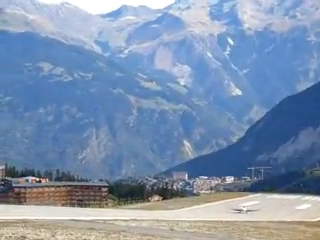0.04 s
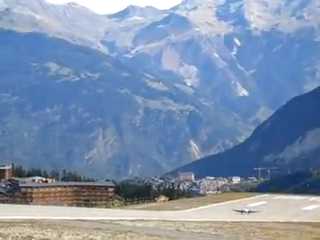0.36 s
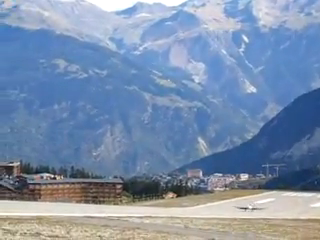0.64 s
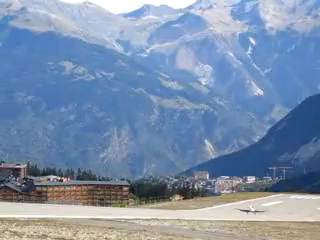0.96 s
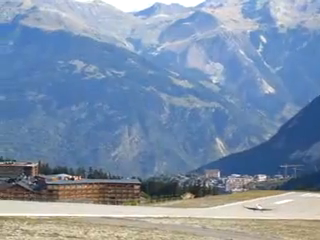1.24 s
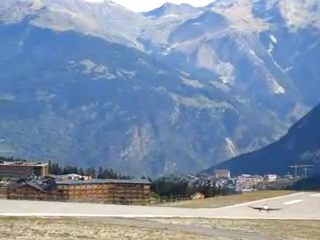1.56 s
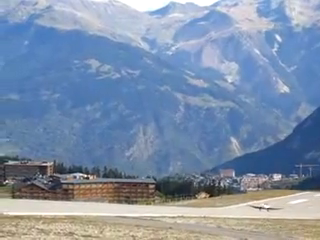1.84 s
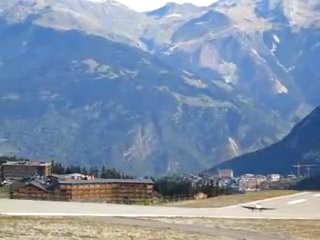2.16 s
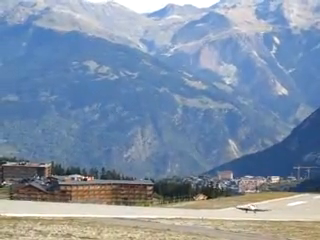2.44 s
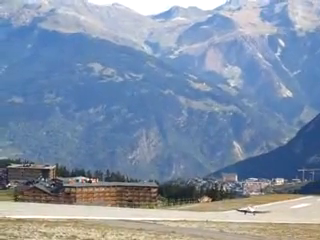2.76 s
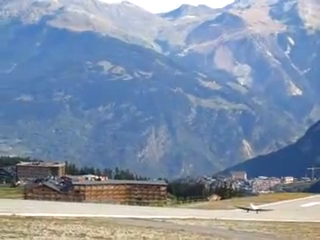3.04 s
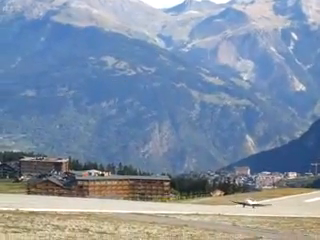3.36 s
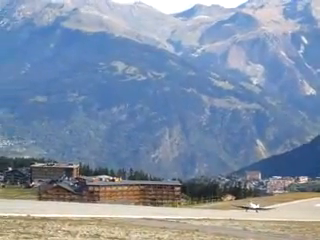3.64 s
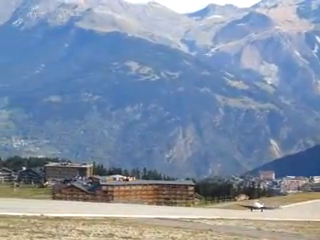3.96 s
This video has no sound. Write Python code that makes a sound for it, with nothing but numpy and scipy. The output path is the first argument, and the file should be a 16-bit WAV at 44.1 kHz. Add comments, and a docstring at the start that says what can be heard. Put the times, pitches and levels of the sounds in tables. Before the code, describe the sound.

A small propeller plane's engine idles fast on an outdoor airstrip. At about 0.8 seconds it slows to a low, uneven burble. From around 1.8 seconds it revs up, rising in pitch and loudness as tyre noise grows, with a few brief exhaust cracks. From 3 seconds it holds a raspy drone until the end at 4 seconds. Wind rumbles on the microphone throughout, over a faint hiss.

```python
"""Light aircraft on a mountain airstrip

A four-cylinder propeller engine idles fast, is throttled back and burbles, then opens up to a drone.
Its periodic firings give low harmonics, excite the exhaust pipe's resonances and modulate a rush of
gas and a rasp. Tyres roll on the runway; wind rumbles on the microphone over faint hiss and a whine."""
import sys
import numpy as np
from scipy import signal
from scipy.fft import rfft, irfft, next_fast_len
from scipy.io import wavfile

SR = 44100
rng = np.random.default_rng(int(sys.argv[2]) if len(sys.argv) > 2 else 0)


def waveform_to_disk(signal):
    """Save audio, clipped to [-1, 1], as 16-bit WAV at the path in sys.argv[1]."""
    frames = np.transpose(np.atleast_2d(signal))
    scaled = np.clip(frames, -1, 1) * 32767
    samples = np.round(scaled).astype(np.int16)
    wavfile.write(sys.argv[1], SR, samples)


N = 176400

# engine speed and drone: (time [s], firing rate [Hz], relative levels of harmonics 1, 2, 3 [dB])
ENGINE = [(0.0, 58.1, -31, -30, -37), (0.34, 58.1, -29, -30, -46), (0.37, 58.0, -31, -30, -30),
          (0.4, 57.7, -29, -28, -40), (0.71, 57.3, -32, -29, -36), (0.79, 53.4, -38, -37, -43),
          (0.81, 52.1, -30, -36, -34), (0.83, 50.9, -31, -38, -52), (0.93, 48.5, -40, -43, -48),
          (0.97, 47.2, -33, -31, -39), (1.12, 42.4, -41, -33, -30), (1.22, 40.6, -44, -36, -42),
          (1.25, 40.0, -39, -31, -35), (1.4, 39.7, -39, -30, -34), (1.76, 39.6, -40, -26, -31),
          (1.9, 43.3, -36, -30, -34), (2.0, 47.4, -32, -27, -30), (2.17, 52.3, -28, -26, -40),
          (2.45, 64.0, -22, -25, -36), (2.52, 66.3, -21, -26, -32), (2.76, 71.8, -25, -24, -29),
          (3.01, 74.6, -28, -25, -25), (3.49, 75.8, -26, -28, -29), (4.0, 75.9, -27, -29, -27)]
# overtones at full power: (frequency [multiple of firing rate], level [dB])
OVERTONES = [(1.25, -36.5), (1.75, -36), (2.75, -43.5), (3.25, -42), (4.5, -46.5), (5, -46.5), (5.5, -43),
             (6, -38.5), (6.5, -49.5), (8.5, -50), (9.5, -47), (11.75, -45.5), (12.75, -44)]
# cylinders in firing order: (relative strength [dB], lateness [share of one firing])
CYLINDERS = [(5.5, 0), (1.5, 0.0848), (-1, -.06), (6.5, .04)]
# reflections from the ground and buildings: (delay [s], mean gain [dB])
ECHOES = [(.0047, -6), (.031, -10.5), (.074, -9.5)]
# engine effort, as relative levels: (time [s], exhaust [dB], rasp [dB], top hiss [dB])
EFFORT = [(0.0, -40, -49.5, -58), (0.47, -38.5, -49, -57.5), (0.84, -44, -52.5, -59),
          (1.32, -43, -57, -57.5), (1.89, -41, -50.5, -61), (2.06, -40.5, -48, -58.5),
          (2.3, -34, -41.5, -49), (2.63, -27.5, -37.5, -46.5), (2.9, -28.5, -37.5, -47),
          (3.0, -29.5, -36.5, -50.5), (3.44, -29.5, -39, -56), (3.61, -29, -39, -47.5),
          (3.95, -29, -39.5, -43.5)]
# low burble of uneven firing: (time [s], level [dB])
BURBLE_LEVEL = [(0, -37), (.45, -31), (.7, -36.5), (1.1, -34), (1.4, -36.5), (1.85, -33), (2.1, -34),
                (2.8, -29.5), (4, -36.5)]
# throttle position: (time [s], opening [0-1])
THROTTLE = [(0, 0.44), (1.95, 0.28), (2.25, 1), (2.85, 0.68), (3.2, 0.52), (4, .65)]
# resonance in the rasp: (time [s], centre [Hz], relative level [dB])
RASP_RESONANCE = [(.2, 3260, -2), (.6, 2740, -1), (1.3, 2700, -10.5), (2.12, 3360, -0.5), (2.38, 2679, -1),
                  (4, 2700, -7)]
# rolling noise of the tyres: (time [s], level [dB])
TYRE_LEVEL = [(.95, -47), (1.3, -57.5), (1.42, -46.5), (1.9, -46.5), (2.32, -35.5)]
# notch that sweeps down as the engine opens up: (time [s], centre [Hz], depth [0-1])
NOTCH = [(.6, 2250, 0.27), (1.9, 2220, 0), (2.3, 2083, .65), (2.47, 1460, 0.57), (3.0, 1210, 0.04)]
# harmonics of the biting propeller: (frequency [multiple of firing rate], relative level [dB])
BITE_HARMONICS = [(4, -35), (5, -44), (6, -39), (11, -41.5)]
# swell of those harmonics: (time [s], gain [dB])
BITE_SWELL = [(2.05, -15), (2.3, -2.5), (2.8, -0.5), (3.15, -18.5)]
# sharp cracks under power: (time [s], level at the crest [dB])
CRACKS = [(2.4225, -26), (2.777, -26), (2.8873, -24.5), (2.9007, -22), (2.9155, -23), (3.0374, -24)]

# spectral envelopes of the sources: (frequency [Hz], relative spectral density [dB])
PIPE_SPECTRUM = [(170, -21), (240, 17), (320, -4), (450, 0.5), (700, 2.5), (800, -9.5), (950, 2.5),
                 (1350, -13.5), (1750, -1), (2100, -24.5), (4000, -38.5)]
RUSH_SPECTRUM = [(200, -4.5), (350, -3), (460, 4), (580, 4), (780, -4.5), (1100, -4.5), (1380, -6),
                 (1750, -8), (2100, -11.5), (4000, -35)]
BURBLE_SPECTRUM = [(35, -24.5), (70, -6), (105, 7.5), (170, 2.5), (260, -1), (300, -8), (350, -24),
                   (550, -14), (800, -54)]
RASP_SPECTRUM = [(1000, -21), (1650, -3.5), (2100, -4.5), (2700, -1), (3350, -3.5), (3900, -11),
                 (5500, -24), (7000, -51.5)]
HISS_SPECTRUM = [(2000, -25.5), (3600, 4.5), (4500, 3.5), (5100, 0), (5700, -1.5), (6400, -32.5),
                 (7000, -28)]
TYRE_SPECTRUM = [(500, -16.5), (700, -2), (810, -5), (980, 2), (1150, -1.5), (1310, -8), (2200, -37.5)]
WIND_SPECTRUM = [(10, -20), (30, 6.5), (70, 8), (130, 0), (260, -17), (400, -39.5), (1000, -56.5)]
AIR_SPECTRUM = [(200, 2), (600, 2.5), (1200, -2.5), (2000, -16.5), (4500, -9.5), (6500, -30)]

IDLE_HZ, POWER_HZ = 51.3, 72.9   # firing rates between which power goes from 0 to 1
FIRING_OFFSET = 0.53   # place of the pulse in the firing cycle
RUSH_THROB, BURBLE_THROB, RASP_THROB = 0.35, 0.54, 1.03   # modulation depths


def from_db(db):
    """Amplitude ratio of a level in decibels."""
    return 10 ** (np.asarray(db) / 20)


def rms_one(x):
    """Normalisation to unit power."""
    return x / np.sqrt(np.mean(x ** 2) + 1e-20)


def in_time(rows):
    """Linear interpolation in time, one curve per column."""
    times, *columns = np.transpose(rows)
    return [np.interp(np.arange(N) / SR, times, column) for column in columns]


def drift(rate_hz):
    """Low-pass filtered noise: a slow random wander of unit power."""
    step, settle = 40, 2000
    pole = np.exp(-2 * np.pi * step * rate_hz / SR)
    white = rng.standard_normal(N // step + settle + 2)
    slow = signal.lfilter([1], [1, -2 * pole, pole * pole], white)[settle:]
    return np.interp(np.arange(N) / step, np.arange(len(slow)), rms_one(slow))


def coloured(x, spectrum):
    """Minimum-phase filtering imposes a spectral envelope causally; unit power."""
    size = 2 * next_fast_len(N)
    hz, db = np.transpose(spectrum)
    grid_hz = np.maximum(np.arange(size // 2 + 1) * SR / size, 1)
    magnitude = from_db(np.interp(np.log(grid_hz), np.log(hz), db))
    cepstrum = irfft(np.log(magnitude))
    response = np.exp(2 * rfft(cepstrum[:size // 2], size))
    return rms_one(irfft(rfft(x, size) * response)[:N])


def noise(spectrum, gate=1):
    """Source and filter: white noise is amplitude-modulated, then coloured."""
    return coloured(gate * rng.standard_normal(N), spectrum)


def band(centre_hz, width_hz, gate):
    """Quadrature modulation shifts gated low-pass noise to a moving centre; unit power."""
    lowpass = signal.butter(2, width_hz / 2, fs=SR, output="sos")
    slow = signal.sosfilt(lowpass, gate * rng.standard_normal((2, N)))
    angle = 2 * np.pi * np.cumsum(centre_hz) / SR
    return rms_one(slow[0] * np.cos(angle) + slow[1] * np.sin(angle))


def drone(phase, rate, harmonic_gain_db=-0.5, fade_db_per_hz=1.4):
    """Periodic sources radiate harmonics: propeller and exhaust hum, with overtones under power."""
    harmonics = overtones = 0
    for k, db in enumerate(in_time(ENGINE)[1:], 1):
        harmonics += from_db(db + harmonic_gain_db + 0.52 * drift(16)) * np.cos(2 * np.pi * k * phase)
    fade_db = fade_db_per_hz * np.maximum(POWER_HZ - rate, 0)
    for multiple, db in OVERTONES:
        angle = 2 * np.pi * (multiple * phase + rng.random()) + 0.25 * drift(6)
        overtones += from_db(db - fade_db + 1.2 * drift(4)) * np.cos(angle)
    return np.sqrt(2) * (harmonics + overtones)


def firings(phase, spread_db=2, jitter_s=0.00012):
    """A quasi-periodic impulse train: strength and timing vary by cylinder and by chance."""
    count = np.arange(1, int(phase[-1]))
    db, lateness = np.array(CYLINDERS)[count % len(CYLINDERS)].T
    timing_scatter, level_scatter = rng.standard_normal((2, len(count)))
    onsets = np.interp(count + lateness, phase, np.arange(N)) + jitter_s * SR * timing_scatter
    clicks = np.zeros(N)
    clicks[np.clip(onsets, 0, N - 1).astype(int)] = from_db(db + spread_db * level_scatter)
    return clicks / np.sqrt(np.gradient(phase))   # equal power at any firing rate


def outdoors(x):
    """Multipath propagation: delayed reflections waver with the moving air; unit power."""
    n = np.arange(N)
    echoes = sum(from_db(db + 2 * drift(2.9)) * np.interp(n - delay_s * SR, n, x, left=0)
                 for delay_s, db in ECHOES)
    return rms_one(x + echoes)


def exhaust(phase, rate):
    """Impulses excite the pipe's resonances; a rush of gas and a low burble throb with them."""
    exhaust_db = in_time(EFFORT)[0]
    power = np.clip((rate - IDLE_HZ) / (POWER_HZ - IDLE_HZ), 0, 1)
    firing = phase - FIRING_OFFSET
    throb = power * np.cos(2 * np.pi * firing) + 0.45 * np.cos(np.pi * firing)
    ringing = outdoors(coloured(firings(firing), PIPE_SPECTRUM))
    pulses = from_db(-11 + 6 * power) * ringing   # under power the pulses gain on the rush
    rush_db = -3 - 2.5 * power + 0.51 * drift(5.1)
    rush = from_db(rush_db) * noise(RUSH_SPECTRUM, np.exp(RUSH_THROB * throb))
    burble = from_db(in_time(BURBLE_LEVEL)[0]) * noise(BURBLE_SPECTRUM, np.exp(BURBLE_THROB * throb))
    return from_db(exhaust_db) * (pulses + rush) + burble


def rasp(phase):
    """Amplitude modulation: a burst of hiss on each firing, sharper as the throttle opens."""
    _, rasp_db, hiss_db = in_time(EFFORT)
    throttle, = in_time(THROTTLE)
    centre_hz, resonance_db = in_time(RASP_RESONANCE)
    burst = np.abs(np.cos(np.pi * (phase - FIRING_OFFSET))) ** 8
    uneven = 1 + 0.18 * drift(45)
    gate = np.exp(RASP_THROB * throttle * (burst - burst.mean()) * uneven)
    broadband = from_db(0.5) * noise(RASP_SPECTRUM, gate)
    resonance = from_db(resonance_db - 4.5) * band(centre_hz, width_hz=320, gate=gate ** 1.3)
    top_hiss = from_db(hiss_db + 0.3) * noise(HISS_SPECTRUM, gate ** 0.5)
    return from_db(rasp_db + 0.5 * drift(8)) * (broadband + resonance) + top_hiss


def tyres():
    """Rolling contact of rubber on the runway radiates a narrow band of noise."""
    return from_db(in_time(TYRE_LEVEL)[0] + 1.7 * drift(2.8)) * noise(TYRE_SPECTRUM)


def swept_notch(x, width_hz=350):
    """Destructive interference: subtracting a moving band gives a phasing colour."""
    centre_hz, depth = in_time(NOTCH)
    carrier = np.exp(2j * np.pi * np.cumsum(centre_hz) / SR)
    pole = np.exp(-np.pi * width_hz / SR)
    baseband = signal.lfilter([1 - pole], [1, -pole], x / carrier)
    return x - 2 * depth * np.real(carrier * baseband)


def wind(mean_db=-36.5, gust_db=1):
    """Pressure fluctuations of wind on the microphone make a low rumble."""
    return from_db(mean_db - gust_db * drift(12)) * noise(WIND_SPECTRUM)


def open_air(level_db=-52):
    """Stationary broadband noise forms a faint outdoor hiss."""
    return from_db(level_db) * noise(AIR_SPECTRUM)


def whine(pitch_hz=2054, mean_db=-63):
    """A thin pure tone wavers under slight random amplitude and phase modulation."""
    amplitude = np.sqrt(2) * from_db(mean_db + drift(2.9))
    return amplitude * np.sin(2 * np.pi * pitch_hz * np.arange(N) / SR + 0.5 * drift(6.5))


def propeller_bite(phase):
    """The propeller growls as it speeds up; phase modulation roughens its upper harmonics most."""
    swell_db, = in_time(BITE_SWELL)
    return np.sqrt(2) * sum(from_db(db + swell_db) * np.cos(2 * np.pi * k * phase + 0.07 * k * drift(20))
                            for k, db in BITE_HARMONICS)


def cracks(half_width_s=0.0011, band_hz=(2200, 3020)):
    """Transients: single firings snap out of the rasp as noise bursts with Gaussian envelopes."""
    t = np.arange(N) / SR
    bandpass = signal.butter(2, band_hz, "band", fs=SR, output="sos")
    hiss = rms_one(signal.sosfilt(bandpass, rng.standard_normal(N)))
    return hiss * sum(from_db(db) * np.exp(-((t - at_s) / half_width_s) ** 2) for at_s, db in CRACKS)


def scene():
    """Superposition of the sources; one firing rate paces drone, exhaust, rasp and propeller."""
    rate = in_time(ENGINE)[0]
    phase = np.cumsum(rate) / SR   # counted in firings
    hum = drone(phase, rate)
    roar = swept_notch(exhaust(phase, rate) + rasp(phase) + tyres())
    surroundings = wind() + open_air() + whine()
    return (hum + roar + surroundings + propeller_bite(phase) + cracks())[None]


def record(dry, stopband_hz=7490):
    """Band limiting: a steep low-pass filter removes the top of the treble."""
    return signal.sosfilt(signal.cheby2(16, 70, stopband_hz, fs=SR, output="sos"), dry)


dry = scene()
out = record(dry)
waveform_to_disk(out)
```